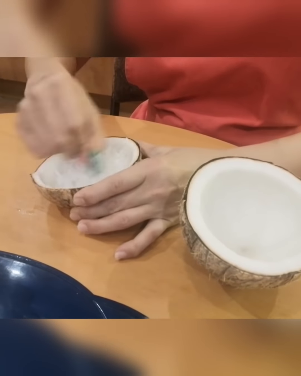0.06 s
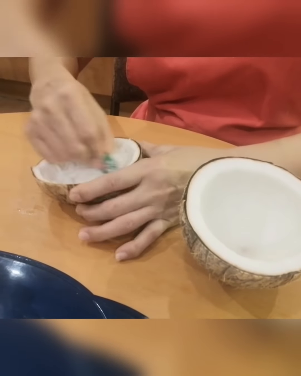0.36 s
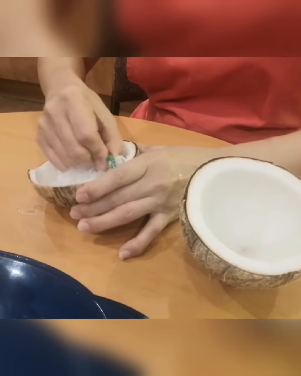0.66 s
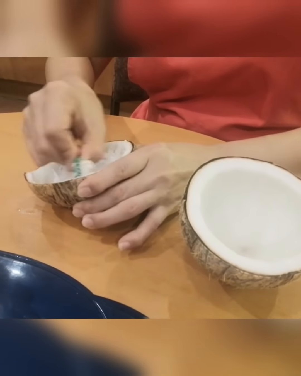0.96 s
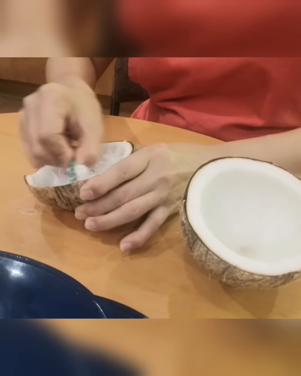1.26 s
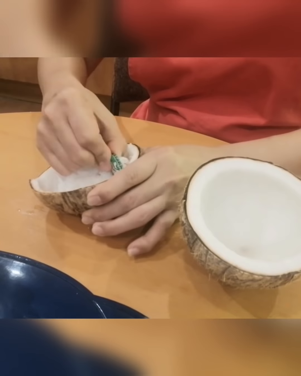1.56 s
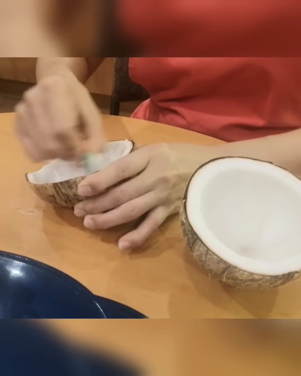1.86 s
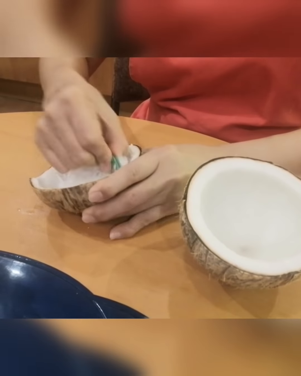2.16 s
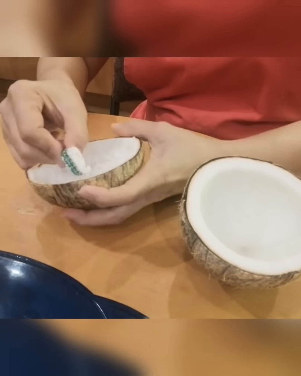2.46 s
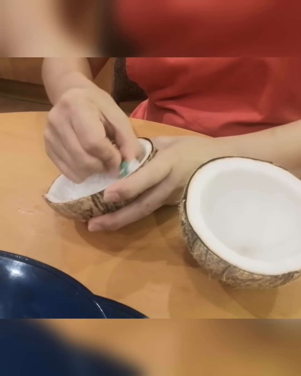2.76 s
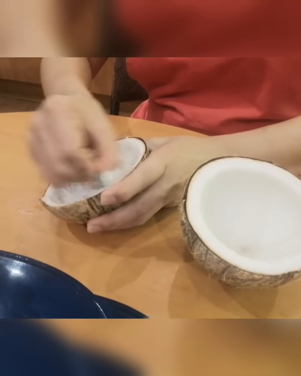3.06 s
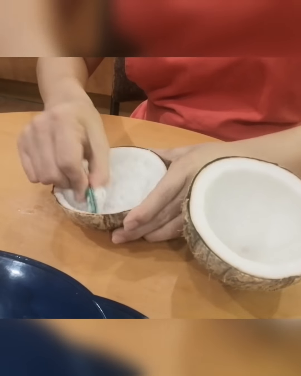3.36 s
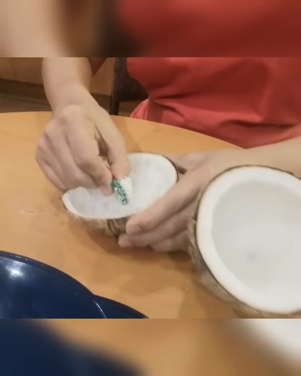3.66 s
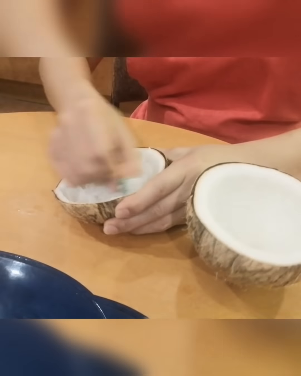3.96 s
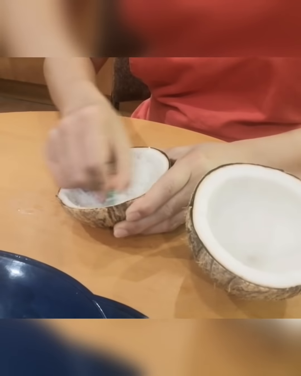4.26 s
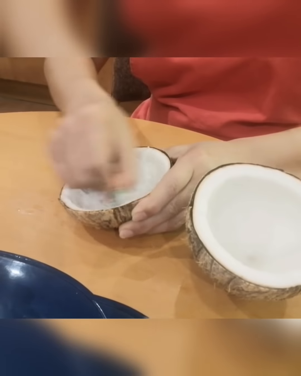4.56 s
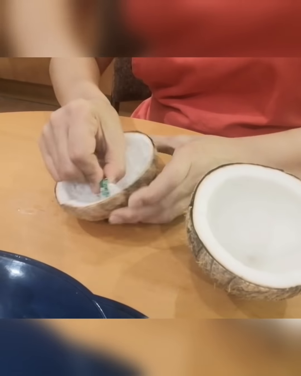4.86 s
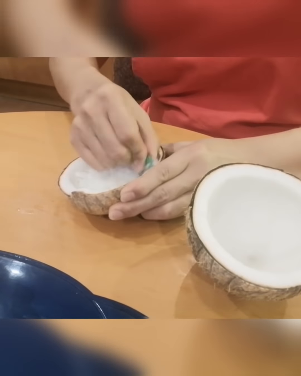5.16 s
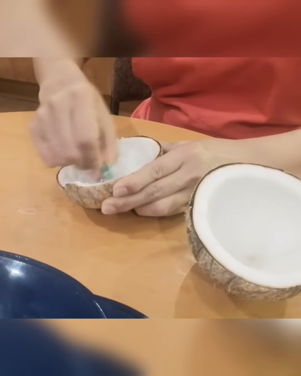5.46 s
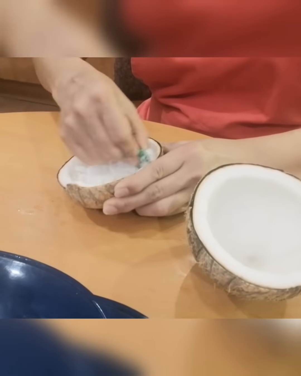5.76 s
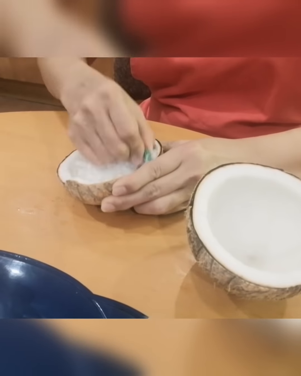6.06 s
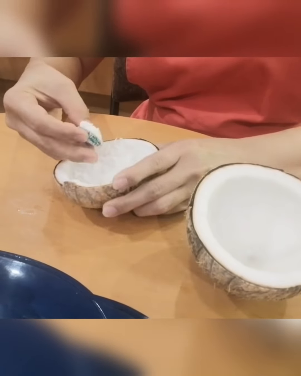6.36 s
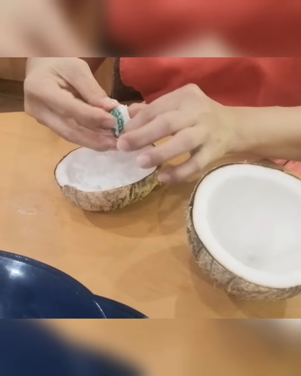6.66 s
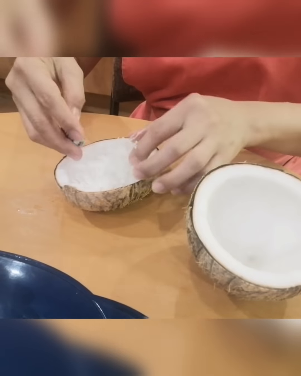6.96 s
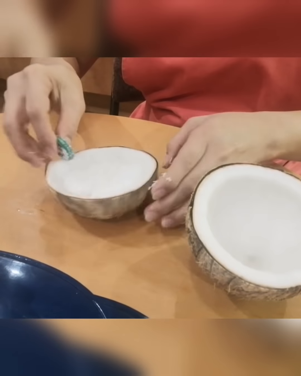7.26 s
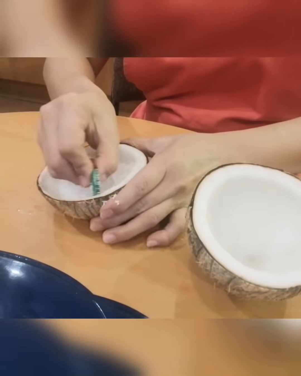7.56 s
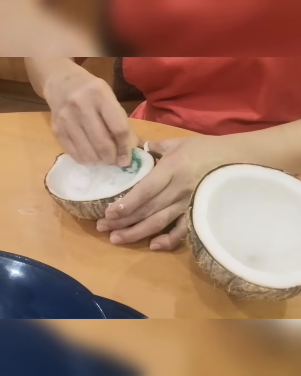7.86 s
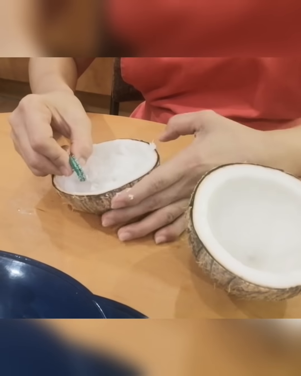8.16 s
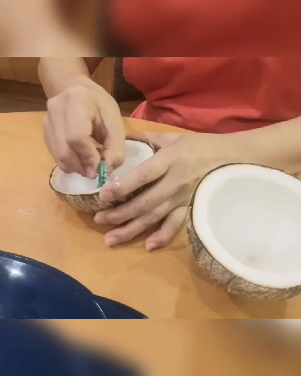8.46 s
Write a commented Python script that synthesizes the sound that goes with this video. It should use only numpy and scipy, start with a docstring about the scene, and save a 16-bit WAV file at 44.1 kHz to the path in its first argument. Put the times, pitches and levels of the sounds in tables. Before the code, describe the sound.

Close up in a quiet kitchen, a metal cap rasps rapidly at the soft flesh inside a coconut shell, now and then catching with a tiny crack. The strokes break off briefly, then resume with a hollower tone and dull bumps of the shell on the table. A longer pause holds a few soft thumps before three final scrapes. A low room rumble and thin hiss continue underneath.

```python
"""A metal bottle cap scrapes the soft meat out of half a coconut held on a wooden kitchen table.
For two seconds, quick strokes tear tiny fibres that ring in the cap and shell; now and then the rim snags.
After a short pause the scraping returns and grows more hollow, while the shell rocks and thumps the table.
Just after six seconds the cap rests, leaving a few bumps, then makes three last strokes near the end.
A low room rumble and a faint high hiss go on throughout."""
import sys
import numpy as np
from scipy import signal
from scipy.fft import rfft, irfft
from scipy.io import wavfile

SR = 44100
rng = np.random.default_rng(int(sys.argv[2]) if len(sys.argv) > 2 else 0)


def output_pcm(signal):
    """Save a mono or channel-first signal as 16-bit PCM at the path in sys.argv[1].

    Samples are clipped to [-1, 1] before scaling.
    """
    pcm = np.clip(np.atleast_2d(signal).T, -1, 1) * 32767
    wavfile.write(sys.argv[1], SR, np.round(pcm).astype(np.int16))


N = 374850

# the pitches at which the metal cap rings: pitch_hz, width_hz, gain_db
CAP_MODES = [(3330, 820, -11), (4950, 660, -1), (6055, 1570, 3), (9250, 3550, -3.5), (12650, 5600, -17)]


def strokes(table_db, wet_db):
    """Pressure swells and fades; the edge sticks and slips, and tearing shakes cap, shell and table."""
    # each stroke of the cap: peak_s, length_s, level_db
    scrapes = [(0.049,0.034,-41), (0.168,0.03,-36.5), (0.277,0.036,-38), (0.378,0.028,-37),
               (0.675,0.049,-40.5), (0.811,0.047,-47.5), (0.916,0.043,-53.5), (1.023,0.045,-46.5),
               (1.128,0.036,-43.5), (1.234,0.044,-41), (1.339,0.053,-43.5), (1.469,0.032,-39),
               (1.58,0.037,-36.5), (1.711,0.055,-41.5), (1.84,0.04,-37.5), (1.962,0.03,-34),
               (2.078,0.039,-38), (2.186,0.025,-35), (2.8,0.044,-38), (2.913,0.032,-38.5),
               (3.02,0.03,-38.5), (3.129,0.04,-40.5), (3.241,0.035,-42), (3.474,0.045,-41.5),
               (3.598,0.034,-41), (3.898,0.038,-36.5), (4.026,0.033,-39.5), (4.127,0.039,-40),
               (4.23,0.029,-41), (4.329,0.034,-37), (4.423,0.031,-37.5), (4.527,0.039,-39.5),
               (4.624,0.041,-44.5), (4.734,0.038,-41), (5.068,0.064,-38.5), (5.207,0.041,-41.5),
               (5.333,0.031,-39.5), (5.446,0.042,-39.5), (5.555,0.029,-34.5), (5.667,0.032,-36.5),
               (5.773,0.049,-40.5), (5.885,0.035,-40), (5.982,0.043,-42), (6.095,0.047,-42.5),
               (6.2,0.024,-43), (7.617,0.087,-56.5), (7.675,0.032,-42.5), (7.871,0.048,-40.5)]
    # the pitches at which the hollow of the shell rings: pitch_hz, width_hz, gain_db
    hollow_modes = [(787, 310, -1.5), (1452, 130, 12), (1740, 1600, -8.5)]
    # how loud the hollow is next to the cap, as the cap works its way round: time_s, gain_db
    hollowness = [(0.05, -22), (0.55, -15), (0.85, -8), (1.05, -16.5), (1.83, -17), (1.97, -12.5),
                  (3.02, -12), (3.6, -1.5), (3.9, -12), (4.12, -16.5), (4.235, -2), (4.42, -6.5),
                  (4.65, -5.5), (5.07, -11), (5.22, -4.5), (6.2, -1), (7.66, -21), (7.87, -12.5)]
    # the shell's main ring follows the place of contact: time_s, pitch_hz
    shell_pitch = [(0.05, 3070), (1.25, 3280), (1.6, 3000), (2.1, 2830), (3.1, 2750), (6.2, 2720),
                   (7.8, 2920)]
    rise_share, glide_db = 0.42, -22
    size = SR // 3
    t = (np.arange(size) - size // 2) / SR
    out = np.zeros((2, N))
    for peak_s, length_s, level_db in scrapes:
        hollow_db = np.interp(peak_s, *np.transpose(hollowness))
        ring_hz = np.interp(peak_s, *np.transpose(shell_pitch))
        slope_s = length_s * np.where(t < 0, rise_share, 1 - rise_share)
        bite = np.exp(-np.abs(t / slope_s) ** 1.73)
        # the edge glides lightly before and after it bites
        glide = from_db(glide_db) * np.exp(-(t / (length_s * 1.02)) ** 2)
        pressure = bite + glide
        slips = from_db(4.0 * flutter(size, per_s=420))
        force = pressure * slips * tearing(size, fibres_per_s=3000, spread_db=4.5, rubbing=0.48)
        cap = high_pass(resonate(force, detuned(CAP_MODES)), hz=2500)
        hollow = high_pass(resonate(force, detuned(hollow_modes)), hz=520)
        shell = high_pass(resonate(force, shell_modes(ring_hz)), hz=1840)
        table = resonate(resonate(force, [(297, 32, 0)]), [(304, 38, 0)])
        # the wet flesh hisses smoothly for as long as the edge slides
        wet = high_pass(pressure ** 0.87 * rng.standard_normal(size), hz=663)
        shell_db = 0.5 + 0.41 * hollow_db
        parts = [(cap, 0), (hollow, hollow_db), (shell, shell_db),
                 (table, hollow_db + table_db), (wet, wet_db)]
        sound = sum(from_db(level_db + db) * rms_one(part) for part, db in parts)
        sound *= np.sqrt(np.mean(pressure ** 2))
        add(out, peak_s + t[0], kitchen(sound, near_db=6.5, room_db=-7.5))
    return out


def tearing(size, fibres_per_s, spread_db, rubbing):
    """Fibres snap at random with uneven strength, over a smooth wet rubbing."""
    snaps = rng.random(size) < fibres_per_s / SR
    strength = from_db(spread_db * np.minimum(rng.exponential(1, size), 4))
    direction = rng.choice([-1, 1], size)
    return rms_one(snaps * strength * direction) + rubbing * rng.standard_normal(size)


def detuned(modes, spread=0.019):
    """Grip and place of contact shift every ringing pitch a little."""
    return [(hz * (1 + spread * rng.standard_normal()), width, db) for hz, width, db in modes]


def shell_modes(hz):
    """The shell has a broad main ring and a weaker one below it."""
    return [(hz, hz * 0.24, 0), (hz * 0.77, hz * 0.28, -7)]


def snags(release_s, width_hz, ring_db):
    """A tooth of the rim lets go with a short crack through the cap, and one pitch rings out."""
    # each snag of the crimped rim: start_s, level_db, pitch_hz
    catches = [(0.265, -21.5, 5040), (.368, -21.5, 5000), (0.675, -24, 6250), (.687, -19.5, 6140),
               (1.116, -30, 3440), (1.466, -23, 5800), (1.583, -23, 6040), (2.076, -26, 2880),
               (2.16, -29.5, 2820), (2.787, -34, 6030), (4.319, -26, 2700), (4.415, -20.5, 2840),
               (4.514, -29, 5000), (5.881, -21.5, 5900), (6.09, -21, 6160), (7.735, -27.5, 5840)]
    size = SR // 30
    out = np.zeros((2, N))
    for start_s, db, hz in catches:
        crack = rng.standard_normal(size) * np.exp(-np.arange(size) / SR / release_s)
        cap = rms_one(resonate(crack, CAP_MODES))
        ring = rms_one(resonate(crack, [(hz, width_hz, 0)]))
        sound = high_pass(cap + from_db(ring_db) * ring, hz=2340)
        add(out, start_s, kitchen(from_db(db) * sound / np.abs(sound).max(), near_db=-0.5))
    return out


def squeals(length_s, width_hz):
    """Now and then the edge sticks and slips evenly, making a short rough squeal."""
    # each squeal of the wet edge on the flesh: peak_s, pitch_hz, level_db
    slips = [(0.264, 5100, -36), (0.65, 4200, -49), (0.797, 4000, -54), (1.025, 3630, -48),
             (1.125, 3350, -39.5), (1.332, 4250, -39.5), (2.08, 2820, -39)]
    t = np.arange(-SR // 16, SR // 16) / SR
    swell = np.exp(-(t / length_s) ** 2)
    out = np.zeros((2, N))
    for peak_s, hz, db in slips:
        band = [(hz, width_hz, 0)]
        squeal = rms_one(resonate(resonate(rng.standard_normal(len(t)), band), band))
        add(out, peak_s + t[0], kitchen(from_db(db) * squeal * swell, near_db=1.5, room_db=-8.0))
    return out


def knocks(release_s):
    """The cap hits the hard shell with a short hollow knock."""
    # each hit: start_s, level_db
    hits = [(2.909, -39), (5.556, -42), (5.675, -35.5), (5.886, -41)]
    # the shell's low ring after a hit: pitch_hz, width_hz, gain_db
    low_modes = [(796, 160, 0), (1010, 180, -7)]
    size = SR // 25
    out = np.zeros((2, N))
    for start_s, db in hits:
        blow = rng.standard_normal(size) * np.exp(-np.arange(size) / SR / release_s)
        knock = high_pass(resonate(blow, low_modes), hz=550)
        add(out, start_s, kitchen(from_db(db) * knock / np.abs(knock).max(), near_db=-10.0))
    return out


def bumps(cutoff_hz):
    """The husk lands softly on the table; a harder landing brings out the highest pitch."""
    # each landing: start_s, level_db, hardness_db
    landings = [(0.364, -38, 5.5), (1.586, -43.5, 6), (1.669, -47, -13), (2.281, -37.5, -7),
                (3.463, -36, -2), (3.493, -36.5, -3), (3.52, -36, 2.5), (3.546, -48, 11), (3.595, -39, 2.5),
                (3.625, -41, -5), (4.502, -43.5, 9), (4.59, -47.5, 13), (4.705, -41, -1), (4.895, -36, 0.5),
                (5.157, -39, -3), (5.313, -46, 16), (6.434, -38.5, -1), (7.339, -40.5, 6)]
    # table and shell ringing together: pitch_hz, gain_db, fade_s (to fall 60 dB), hardness_share
    table_modes = [(162.2, -4.5, 0.34, -0.67), (177, 1, 0.11, -0.41), (307.2, 3, 0.12, 0.81)]
    t = np.arange(SR // 3) / SR
    swell = 1 - np.exp(-t / 0.0013)
    out = np.zeros((2, N))
    for start_s, db, hardness_db in landings:
        thump = 0
        for hz, gain_db, fade_s, share in table_modes:
            pitch_hz = hz * (1 + 0.058 * rng.standard_normal())
            fade = from_db(gain_db + share * hardness_db - 60 * t / fade_s)
            thump += fade * np.sin(2 * np.pi * pitch_hz * t)
        landing = kitchen(from_db(db) * thump * swell, near_db=-13.0, room_db=-13.0)
        add(out, start_s, landing)
        # the round shell rocks back for a second, softer touch
        add(out, start_s + 0.016 * (1 + rng.random()), from_db(-13.0) * landing)
    return low_pass(out + 1e-18, cutoff_hz)


def thuds(frame_hz, swell_s):
    """Under the weight of the arms, the table's frame swings a few times with a deep thud."""
    # each push on the table: start_s, level_db
    pushes = [(0.259, -46.5), (.355, -42), (3.125, -43.5), (3.575, -46), (3.84, -40.5), (4.499, -43),
              (5.301, -43.5), (6.18, -42), (7.35, -43)]
    t = np.arange(SR // 3) / SR
    swing = t / swell_s * np.exp(1 - t / swell_s) * np.sin(2 * np.pi * frame_hz * t)
    out = np.zeros((2, N))
    for start_s, db in pushes:
        add(out, start_s, from_db(db) * swing[None])
    return out


def rubs(length_s, width_hz):
    """Skin dragged over the husk gives a brief, faint squeak."""
    # each rub: peak_s, pitch_hz, level_db
    drags = [(2.691, 1610, -59), (7.157, 1130, -57.5), (7.158, 1710, -64)]
    t = np.arange(-SR // 8, SR // 8) / SR
    swell = np.exp(-(t / length_s) ** 2)
    out = np.zeros((2, N))
    for peak_s, hz, db in drags:
        squeak = rms_one(resonate(rng.standard_normal(len(t)), [(hz, width_hz, 0)]))
        add(out, peak_s + t[0], kitchen(from_db(db) * squeak * swell))
    return out


def kitchen(x, near_db=0.0, room_db=-14.0):
    """Echoes come off hands and bowl, then the duller room; they differ each time, as the hand moves."""
    near_fade_s, room_fade_s = 0.038, 0.18
    t = np.arange(SR // 4) / SR
    near, room = rng.standard_normal((2, 2, len(t)))
    near = near * from_db(-60 * t / near_fade_s)
    room = low_pass(room, hz=8000) * from_db(-60 * t / room_fade_s) * (t > .006)
    paths = (from_db(near_db) * rms_one(near) + from_db(room_db) * rms_one(room)) / np.sqrt(len(t))
    # the direct sound reaches the right microphone three samples sooner
    paths[[0, 1], [3, 0]] += 1
    return signal.fftconvolve(x[None], rms_one(paths) / np.sqrt(len(t)), axes=1)


def rumble(noise_db, drone_db):
    """Low room noise, louder on the left, sets the room droning at its own pitches."""
    # the tone of the rumble: pitch_hz, gain_db
    tone = [(22, -21.5), (55, -4.5), (85, -13.5), (120, -5.5), (220, -6), (350, -9), (480, -17),
            (700, -15.5), (1500, -27), (3100, -29.5), (4200, -43), (8000, -84)]
    # how alike left and right are: pitch_hz, likeness (0 to 1)
    likeness = [(60, 0.97), (240, 0.79), (480, 0.67), (950, 0.06), (1900, 0.01)]
    common, side = rfft(rng.standard_normal((2, N)))
    alike = at_hz(likeness)
    air = irfft(np.sqrt(1 + alike) * common + np.sqrt(1 - alike) * side * [[1], [-1]], N)
    room_modes = [(179.6, 9.6, -0.5), (161.7, 4.9, 3.0), (303.5, 11, -15.5)]
    drone = from_db(drone_db) * rms_one(resonate(air, room_modes))
    noise = from_db(noise_db) * rms_one(colour(air, tone))
    return noise * from_db([[2.1], [-2.1]]) + drone * from_db([[3.0], [-4.0]])


def hiss(level_db, whine_width_hz):
    """A steady high hiss has a few thin whines in it."""
    # the tone of the hiss: pitch_hz, gain_db
    tone = [(3800, -36), (5200, -13), (6600, -4), (7700, -8.5), (8300, -3.5), (9200, -8.5), (11000, -20.5),
            (15000, -22.5)]
    # each whine: pitch_hz, level_db
    whines = [(5152, -78), (5739, -72.5), (6498, -68), (8242, -70.5), (9076, -69.5)]
    high_noise = high_pass(rng.standard_normal((2, N)), hz=3180)
    broad = from_db(level_db) * rms_one(colour(high_noise, tone))
    white = rng.standard_normal((2, N))
    thin = sum(from_db(db) * rms_one(resonate(white, [(hz, whine_width_hz, 0)])) for hz, db in whines)
    return broad + thin


def from_db(db):
    """Turn decibels into a number to multiply by."""
    return 10 ** (np.asarray(db) / 20)


def rms_one(x):
    """Scale a sound so its average power is one."""
    return x / np.sqrt(np.mean(x ** 2) + 1e-20)


def at_hz(points):
    """Fill in rows of (pitch_hz, value) to give a value at every frequency."""
    hz, value = np.transpose(points)
    return np.interp(np.log(np.arange(N // 2 + 1) * SR / N + 1), np.log(hz), value)


def colour(x, points):
    """Make pitches louder or softer by rows of (pitch_hz, gain_db)."""
    return irfft(rfft(x) * from_db(at_hz(points)), N)


def resonate(x, modes):
    """Let x ring at each mode (pitch_hz, width_hz, gain_db); add the rings with alternating signs."""
    out = 0
    for k, (hz, width, db) in enumerate(modes):
        r = np.exp(-np.pi * width / SR)
        poles = [1, -2 * r * np.cos(2 * np.pi * hz / SR), r * r]
        ring = signal.lfilter((1 - r * r) / 2 * np.array([1, 0, -1]), poles, x + 1e-18)
        out = out + (-1) ** k * from_db(db) * ring
    return out


def high_pass(x, hz):
    """Remove what lies below hz."""
    return signal.sosfilt(signal.butter(4, hz, "high", fs=SR, output="sos"), x)


def low_pass(x, hz):
    """Soften what lies above hz."""
    return signal.sosfilt(signal.butter(2, hz, fs=SR, output="sos"), x)


def flutter(size, per_s):
    """Make random swings about 1 in size, per_s times a second."""
    knots = rng.standard_normal(size)
    return np.interp(np.arange(size) * per_s / SR, np.arange(size), knots)


def add(out, start_s, sound):
    """Mix a sound into both sides of out, beginning at start_s."""
    start = round(start_s * SR)
    first, last = max(start, 0), min(start + sound.shape[1], N)
    out[:, first:last] += sound[:, first - start:last - start]


def scene():
    """Each microphone colours the scraping in its own way; the table's thumps are louder on the left."""
    # the tone of the two microphones: pitch_hz, left_db, right_db
    mic_tone = [(1160, -5, -4.5), (1550, 2.5, -3.5), (2720, 3.5, 1), (3660, 1.5, -1.5), (4980, 9.5, 1.5),
                (6230, 5, -10), (7600, -4.5, -7), (8450, -12, -1), (13600, 3.5, -1), (14400, 4.5, -2)]
    treble = strokes(table_db=-1.5, wet_db=-8.5)
    treble += snags(release_s=0.0024, width_hz=700, ring_db=4.0)
    treble += squeals(length_s=0.0081, width_hz=720)
    treble += knocks(release_s=0.003)
    treble += rubs(length_s=0.037, width_hz=65)
    treble += hiss(level_db=-64.0, whine_width_hz=90)
    left = colour(treble[0], np.array(mic_tone)[:, [0, 1]])
    right = colour(treble[1], np.array(mic_tone)[:, [0, 2]])
    table = bumps(cutoff_hz=496) + thuds(frame_hz=58.3, swell_s=0.011)
    background = rumble(noise_db=-51.5, drone_db=-55.0)
    return np.array([left, right]) + table * from_db([[2.3], [-2.8]]) + background


def record(dry):
    """The very highest treble is cut off steeply."""
    cutoff_hz = 15850
    return signal.sosfilt(signal.ellip(12, .1, 80, cutoff_hz, fs=SR, output="sos"), dry)


dry = scene()
out = record(dry)
output_pcm(out)
```